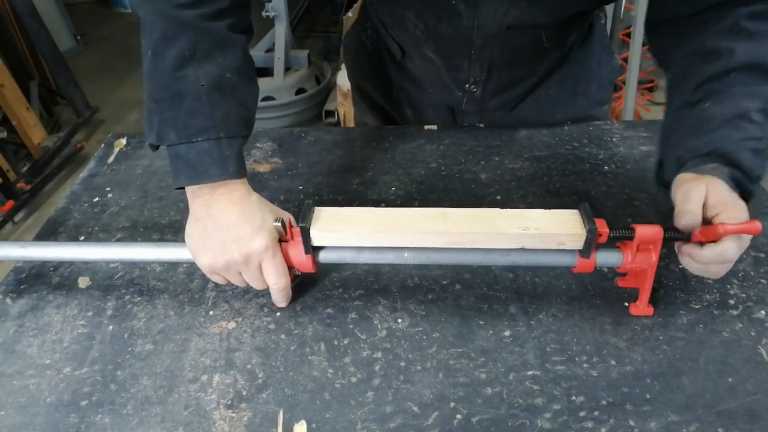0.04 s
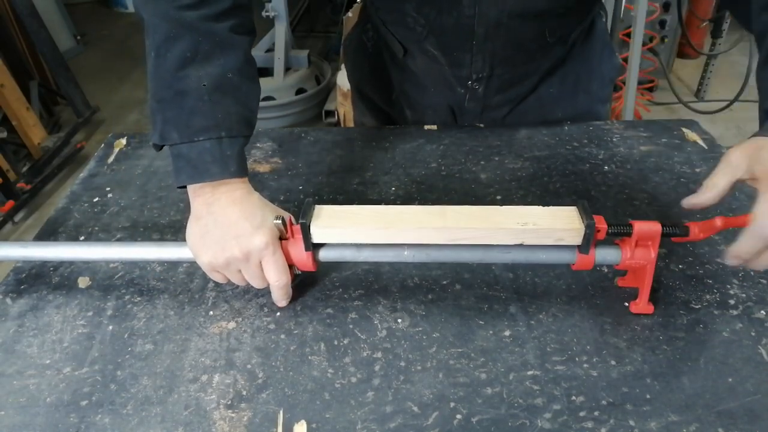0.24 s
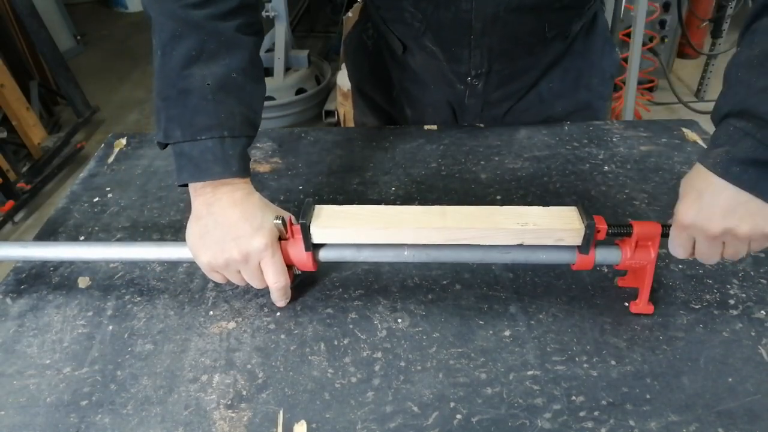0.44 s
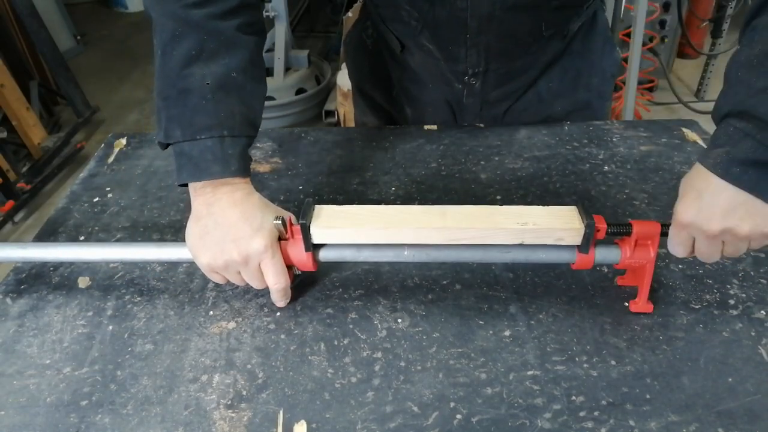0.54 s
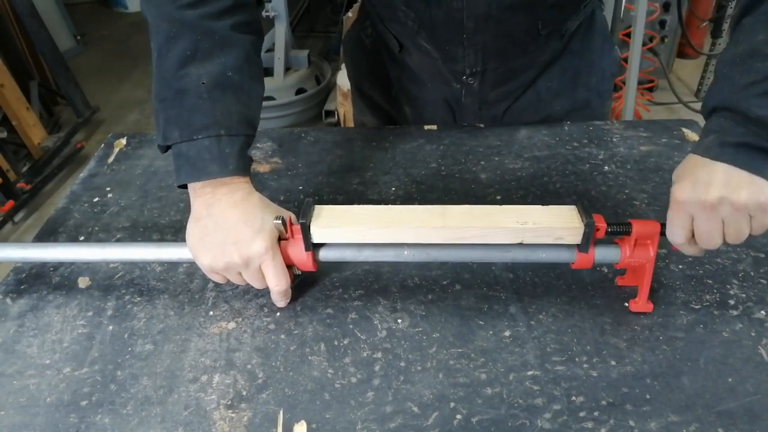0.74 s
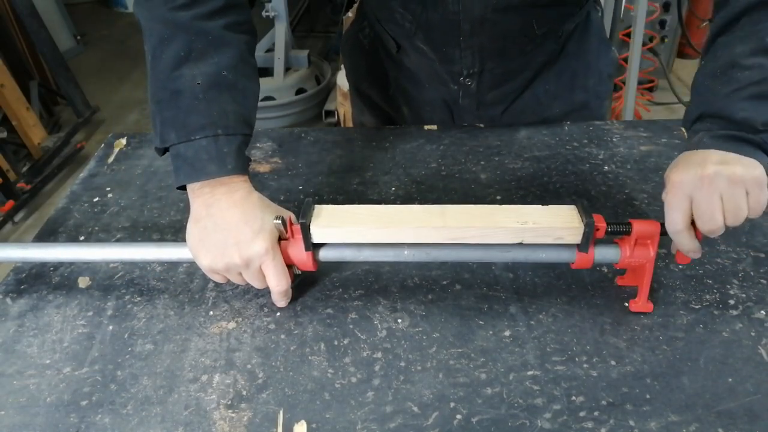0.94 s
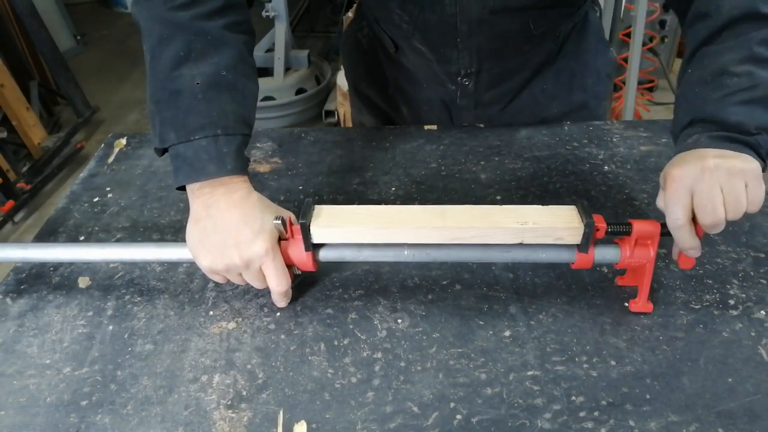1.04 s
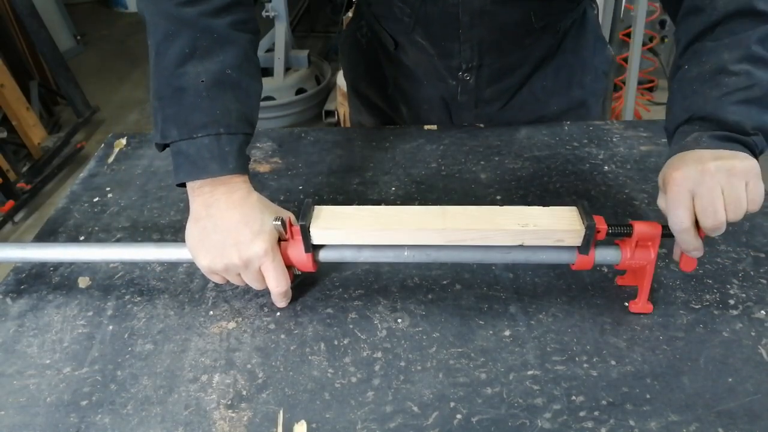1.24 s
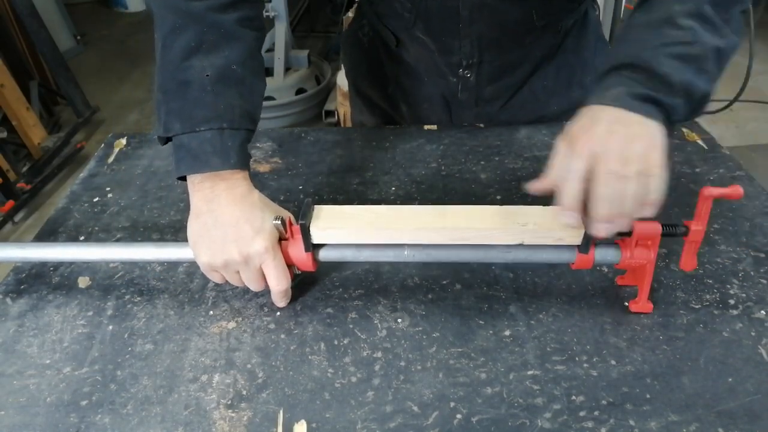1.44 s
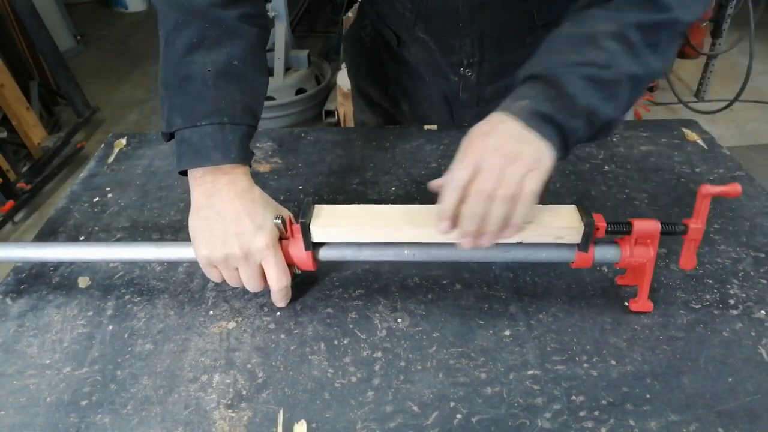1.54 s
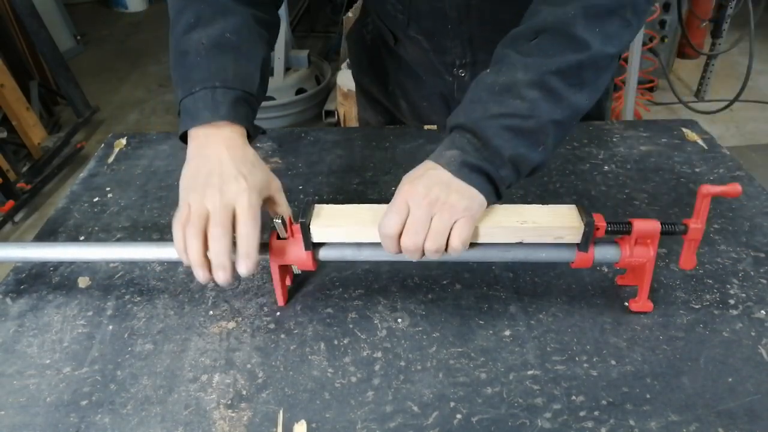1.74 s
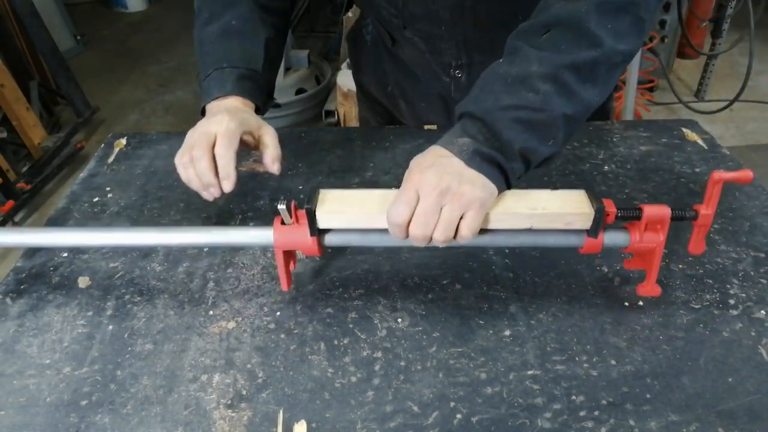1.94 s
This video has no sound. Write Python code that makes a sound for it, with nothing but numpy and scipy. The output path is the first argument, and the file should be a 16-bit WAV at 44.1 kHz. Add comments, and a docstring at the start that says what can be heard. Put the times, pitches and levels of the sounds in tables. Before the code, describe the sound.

Close stereo pickup of a pipe clamp on a bench: a boomy knock, rumbling screw turns with loose metal ticking, near silence, then firm clacks, more grinding and a soft swish in a small room.

```python
"""Pipe clamp cranked on a workbench

Jaws and feet knock dully and make the bench top boom: soft pushes excite a bank of damped modes. The turning
screw rumbles through the bench as a train of random slips, and loose parts rattle. Narrow bands of noise make
its faint squeaks; shaped noise is the movement of sleeves and hands. The bench rings on in a decaying room,
over the low, nearly steady noise of a quiet workshop."""
import sys
import numpy as np
from scipy import signal
from scipy.fft import rfft, irfft, next_fast_len
from scipy.io import wavfile
from scipy.ndimage import map_coordinates

SR = 44100
rng = np.random.default_rng(int(sys.argv[2]) if len(sys.argv) > 2 else 0)


def attenuation_scalar(level_db):
    """Turn a level in dB into a linear amplitude multiplier (20 dB per decade)."""
    decades = np.asarray(level_db, float) / 20
    return 10 ** decades


def unload_audio(sound):
    """Save the sound as a 16-bit wav file, at the path given as the first command line argument."""
    columns = np.transpose(np.atleast_2d(sound))
    # keep every value between -1 and 1, then stretch to whole-number steps
    steps = np.round(np.clip(columns, -1, 1) * 32767)
    wavfile.write(sys.argv[1], SR, steps.astype(np.int16))


N = 88200  # length in samples


def unit_rms(x):
    """Normalisation: equal mean power, rms 1."""
    return x / np.sqrt(np.mean(x ** 2) + 1e-20)


def along(points, hz):
    """Spectral interpolation: (Hz, value) points joined on a logarithmic frequency axis."""
    point_hz, value = np.transpose(points)
    return np.interp(np.log(hz + 1), np.log(point_hz + 1), value)


def envelope(rows):
    """Amplitude envelope: (s, dB) rows joined linearly in decibels, as a gain per sample."""
    start_s, level_db = np.transpose(rows)
    return attenuation_scalar(np.interp(np.arange(N) / SR, start_s, level_db))


def wobble(knots_per_s):
    """Slow random modulation: a smooth curve through random knots."""
    knots = rng.standard_normal(int(N * knots_per_s / SR) + 4)
    return map_coordinates(knots, [np.arange(N) * knots_per_s / SR])


def filtered(x, response):
    """Linear filtering: the spectrum times a response of frequency."""
    size = next_fast_len(N + SR // 2)
    hz = np.fft.rfftfreq(size, 1 / SR)
    return irfft(rfft(x, size) * response(hz), size)[..., :N]


def band_noise(hz, width_hz):
    """Band-limited noise: a Gaussian passband, independent left and right, rms 1."""
    noise = rng.standard_normal((2, N))
    return unit_rms(filtered(noise, lambda f: np.exp(-((f - hz) / width_hz) ** 2)))


def stereo_noise(spectrum, likeness):
    """Partial coherence: the mid and side shares of shaped noise set the left-right likeness; rms 1."""
    def mid_side(hz):
        angle = np.arccos(np.clip(along(likeness, hz), -1, 1)) / 2
        return attenuation_scalar(along(spectrum, hz)) * [np.cos(angle), np.sin(angle)]

    mid, side = filtered(rng.standard_normal((2, N)), mid_side)
    return unit_rms(np.array([mid + side, mid - side]))


# Modes of bench, block and pipe ringing together: pitch_hz [Hz], relative level_db [dB], t60_s [s]
BENCH_MODES = [(115, -7.5, 0.13), (140, 0.5, .18), (168.5, -1.5, 0.14), (217, 1, 0.16), (261.4, 4, 0.11),
               (290.2, -1.5, .12), (372.2, -9, 0.35), (432.6, -4, 0.15), (484.8, 2.5, 0.057),
               (559.5, -7.5, 0.086), (640, -18, 0.36), (732, -3, 0.043), (796, -23.5, 0.033),
               (1118, -10, 0.033), (1233, -6.5, .03), (1450, -16, 0.051), (1950, -2, 0.0067),
               (3000, -43, 0.022)]


def struck_bench(contact_ms, colour_db, shift):
    """Modal synthesis: damped modes convolved with a soft push; a longer contact dulls the sound."""
    swell_cycles = 0.27  # time constant in which each mode spreads over the bench top
    radiates_hz = 112.6  # the bench top is too small to radiate well below this
    hz, db, t60 = np.transpose(BENCH_MODES)[:, :, None]
    t = np.arange(SR // 3) / SR
    decay = attenuation_scalar(db + colour_db[:, None] - 60 * t / t60)
    swell = 1 - np.exp(-t * hz / swell_cycles)
    modes = decay * swell * np.sin(2 * np.pi * hz * (1 + shift[:, None]) * t)
    push = t * t * np.exp(-4 * np.pi * t / (contact_ms / 1000))
    ring = signal.fftconvolve(np.sum(modes, axis=0), push[:SR // 50])[:len(t)]
    highpass = signal.butter(N=3, Wn=radiates_hz, btype="high", fs=SR, output="sos")
    return -signal.sosfilt(highpass, ring)


# Modes of the loose cast jaws and plates: pitch_hz [Hz], relative level_db [dB], t60_s [s, rattle only]
JAW_MODES = [(1184, -0.5, 0.088), (1414, 2, .04), (1694, 3, 0.017), (2015, 0.5, 0.04), (2503, -6.5, 0.039),
             (2925, -8, 0.048), (3250, -24, 0.019)]


def jaw_click(chance):
    """Modal synthesis: the jaw modes start together, vary in level by chance and share one short decay."""
    click_t60_s, scatter_db = 0.024, 2
    t = np.arange(SR // 20) / SR
    hz, db, _ = np.transpose(JAW_MODES)[:, :, None]
    gains = attenuation_scalar(db + scatter_db * chance[:len(JAW_MODES), None])
    return np.sum(gains * np.sin(2 * np.pi * hz * t), axis=0) * attenuation_scalar(-60 * t / click_t60_s)


# Knocks of jaws and feet: start_s [s], peak level_db [dB], contact_ms [ms],
# place along the bench [rad], click_db, peak level of the jaws' click [dB]
KNOCKS = [(.17, -37, 0.29, 0.57, -57), (0.203, -19, 4.65, 1.54, -52), (0.227, -38.5, 4.1, 1.8, -67),
          (.566, -40.5, 3.6, 0.63, -75), (.65, -36, 0.54, 0.6, -48), (.764, -30.5, 2.64, 1.3, -74),
          (0.953, -61, 3, 0.32, -86), (1.051, -56, 1.9, 0.2, -88), (1.276, -56.5, 1.7, 0.77, -81),
          (1.321, -59.5, 1.6, 0.89, -69), (1.3472, -30, 2.4, 0.91, -53.5), (1.4265, -24, 2.33, 0.64, -44),
          (1.525, -32, 1, 0.62, -55.5), (1.539, -41.5, 1.5, 0.2, -72), (1.656, -53, 0.52, 0.71, -61)]


def knocks():
    """Modal excitation: place and softness of each blow colour the same modes; the jaws click with it."""
    place_db, scatter_db = 4.5, 1.5  # how much the place and chance change each mode
    detune = 0.01  # grip and load shift each mode a little from knock to knock (fraction of pitch)
    out = np.zeros(N + SR)
    order = np.arange(len(BENCH_MODES))
    chances = rng.standard_normal((len(KNOCKS), 3, len(BENCH_MODES)))
    for (start_s, level_db, contact_ms, place, click_db), chance in zip(KNOCKS, chances):
        colour_db = place_db * np.cos(order * place) + scatter_db * chance[0]
        hit = struck_bench(contact_ms, colour_db, detune * chance[1])
        click = jaw_click(chance[2])
        start = round(start_s * SR)
        out[start:start + len(hit)] += attenuation_scalar(level_db) * hit / np.abs(hit).max()
        out[start:start + len(click)] -= attenuation_scalar(click_db) * click / np.abs(click).max()
    return out[:N]


# Screw and feet grinding on the bench: start_s [s], level_db [dB]
GRINDING = [(0, -62.5), (.16, -78.5), (.18, -55.5), (.29, -47), (.35, -57), (.39, -64), (.5, -76),
            (.535, -58), (.57, -51), (.63, -59), (.69, -48.5), (.725, -47), (.755, -67), (.82, -48),
            (.9, -68.5), (1.0, -75), (1.13, -71), (1.29, -69), (1.33, -58), (1.37, -43), (1.41, -54),
            (1.5, -51.5), (1.55, -46), (1.61, -48.5), (1.7, -63), (1.77, -74.5), (2, -82)]


def rumble():
    """Stick-slip friction: small random slips of screw and feet, heard through the bench modes."""
    slips_per_s, slip_ms, slip_spread_db = 700, 2.2, 2
    sway_db, sway_hz, sway_width_hz = -10.5, 44.4, 8.3  # the stand sways with the grinding
    grinding = envelope(GRINDING)
    happens = rng.random(N) < slips_per_s / SR
    slips = happens * rng.standard_normal(N) * attenuation_scalar(slip_spread_db * wobble(39.23))
    still = np.zeros(len(BENCH_MODES))
    body = struck_bench(slip_ms, still, still)
    ground = signal.fftconvolve(slips * grinding, body)[:N]
    ground = ground / np.linalg.norm(body) / np.sqrt(slips_per_s / SR)
    sway = attenuation_scalar(sway_db) * grinding * band_noise(sway_hz, sway_width_hz)[0]
    return ground + sway


def rattle():
    """Secondary impacts: loose parts tick after knocks, most after hard ones, and during grinding."""
    rattle_db, rattle_t60_s = -36.5, 0.18  # relative to the peak of a knock with 1 ms contact
    ticks_per_s, grind_db = 400, -21.5  # grind_db is relative to the grinding level
    t = np.arange(N) / SR
    shake = attenuation_scalar(grind_db) * envelope(GRINDING)
    for start_s, level_db, contact_ms, *_ in KNOCKS:
        decay = attenuation_scalar(level_db + rattle_db - 60 * np.abs(t - start_s) / rattle_t60_s)
        shake += decay * (t > start_s) / contact_ms  # short, hard contacts shake more
    ticks = (rng.random((2, N)) < ticks_per_s / SR) * rng.standard_normal((2, N)) * shake
    hz, db, t60 = np.transpose(JAW_MODES)[:, :, None]
    ring_t = t[:SR // 8]
    ring = np.sum(attenuation_scalar(db - 60 * ring_t / t60) * np.sin(2 * np.pi * hz * ring_t), axis=0)
    rung = signal.fftconvolve(ticks, ring[None], axes=1)[:, :N]
    return rung / np.linalg.norm(ring) / np.sqrt(ticks_per_s / SR)


# Squeaks and swishes: start_s [s], level_db [dB], length_s [s], pitch_hz [Hz], half width_hz [Hz]
SQUEAKS = [(.175, -81, .07, 4500, 100), (.54, -76, .045, 5250, 70), (.67, -69, .03, 1120, 60),
           (.805, -70, .06, 1075, 40), (1.235, -82, .03, 5800, 300), (1.345, -80, .045, 5600, 300),
           (1.35, -84, .04, 9300, 600), (1.635, -73, .07, 7500, 900), (1.635, -83, .07, 11800, 700),
           (1.65, -77, .12, 4120, 70), (1.7, -78, .06, 8000, 600), (1.75, -76, .05, 7400, 800),
           (1.75, -83, .05, 10000, 900), (1.82, -87, .12, 11500, 500)]


def squeaks():
    """Friction noise: faint narrow bands that swell and fade."""
    t = np.arange(N) / SR
    out = np.zeros((2, N))
    for start_s, level_db, length_s, pitch_hz, width_hz in SQUEAKS:
        progress = np.clip((t - start_s) / length_s, 0, 1)
        swell = np.sqrt(4 * progress * (1 - progress))
        out += attenuation_scalar(level_db + 1.5 * wobble(60)) * swell * band_noise(pitch_hz, width_hz)
    return out


# Movement of sleeves and hands: start_s [s], level_db [dB]
RUSTLE = [(0.0, -75), (0.15, -75.5), (0.18, -69), (0.34, -62.5), (0.52, -70.5), (0.57, -61.5),
          (0.59, -68.5), (0.7, -67.5), (0.86, -73), (1.06, -70), (1.22, -89), (1.26, -89), (1.31, -72),
          (1.36, -64), (1.42, -73.5), (1.43, -64), (1.44, -76.5), (1.63, -70.5), (1.65, -57.5),
          (1.71, -63.5), (1.97, -71.5), (2.0, -75)]
# Spectrum of cloth and skin: pitch_hz [Hz], relative density_db [dB per Hz]
CLOTH_SPECTRUM = [(500, 7), (900, -3), (1500, -5.5), (2500, -5.5), (4000, -14), (7000, -15), (10000, -21.5),
                  (15000, -26)]


def rustle():
    """Broadband friction: cloth and skin near the microphones, as shaped noise under an envelope."""
    likeness = [(1000, 0.9), (8000, 0.18)]  # (Hz, left-right correlation)
    return envelope(RUSTLE) * attenuation_scalar(1.5 * wobble(25.36)) * stereo_noise(CLOTH_SPECTRUM, likeness)


# Decay of the room: pitch_hz [Hz], t60_s [s]
ROOM_DECAY = [(100, 1), (500, 0.25), (1500, 0.43), (5000, 0.093)]
# Strength of the room: pitch_hz [Hz], level_db over the direct sound [dB]
ROOM_LEVEL = [(60, -23.5), (150, -22.5), (300, -3.5), (600, -2.5), (1500, 7), (3000, -24)]


def workshop_room(x):
    """Reverberation: convolution with noise in which each frequency dies at its own speed."""
    hz, t, noise = signal.stft(rng.standard_normal((2, SR // 2)), SR, nperseg=512)
    fade = attenuation_scalar(-60 * t / along(ROOM_DECAY, hz)[:, None])
    fade = fade / np.linalg.norm(fade, axis=1, keepdims=True)
    fade = fade * attenuation_scalar(along(ROOM_LEVEL, hz))[:, None]
    tail = signal.istft(noise * fade, SR, nperseg=512)[1] / np.sqrt(256)
    delayed = np.pad(x, (200, 0))  # in samples
    return signal.fftconvolve(delayed[None], tail, axes=1)[:, :N]


# Spectrum of the quiet workshop: pitch_hz [Hz], relative density_db [dB per Hz]
FLOOR_SPECTRUM = [(20, -2.5), (40, 2.5), (70, 0), (120, -5), (250, -14.5), (500, -18), (1000, -22),
                  (2200, -26), (5000, -32), (8000, -38.5), (12000, -44.5), (15000, -46)]
# Stereo likeness of the quiet workshop: pitch_hz [Hz], left-right correlation [-1 to 1]
FLOOR_LIKENESS = [(60, 0.89), (240, 0.67), (930, -0.041), (3690, -0.25), (14600, 0.1)]


def workshop_floor():
    """Stationary noise: a low-heavy, partly coherent background whose level drifts slightly."""
    floor_db = -61
    return attenuation_scalar(floor_db + 0.6 * wobble(6)) * stereo_noise(FLOOR_SPECTRUM, FLOOR_LIKENESS)


def scene():
    """Superposition: bench sounds and their room, loose parts, hands and background add up."""
    bench = knocks() + rumble()
    return bench + workshop_room(bench) + rattle() + squeaks() + rustle() + workshop_floor()


def top_cut(x):
    """Nothing passes above the cut-off."""
    return signal.sosfilt(signal.butter(12, 15150, fs=SR, output="sos"), x)


# Balance of the two microphone ports: pitch_hz [Hz], left minus right level_db [dB]
PORT_BALANCE = [(60, -1.3), (150, 0), (400, -1), (3000, -2), (12000, 0.5)]


def record(dry):
    """Interchannel level difference: two microphone ports lean left or right by frequency."""
    mix = filtered(dry, lambda hz: attenuation_scalar(np.outer([0.5, -0.5], along(PORT_BALANCE, hz))))
    return top_cut(mix)


dry = scene()
out = record(dry)
unload_audio(out)
```